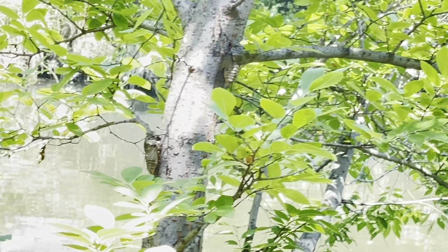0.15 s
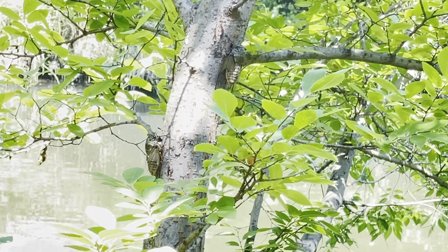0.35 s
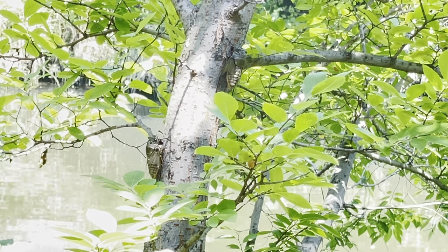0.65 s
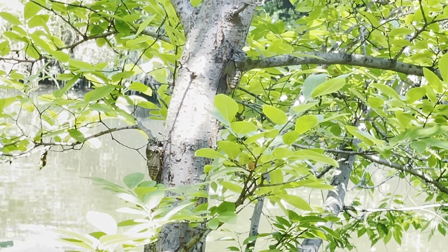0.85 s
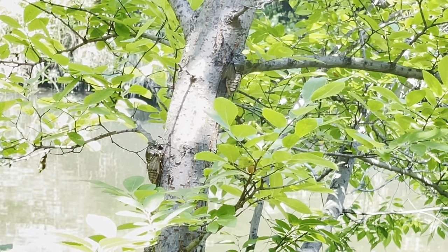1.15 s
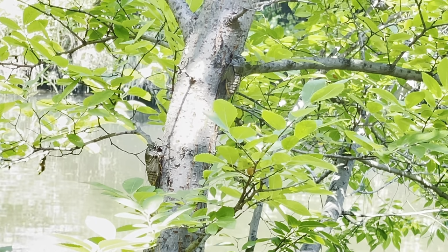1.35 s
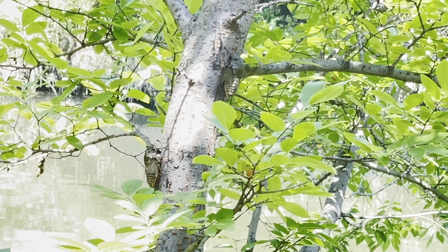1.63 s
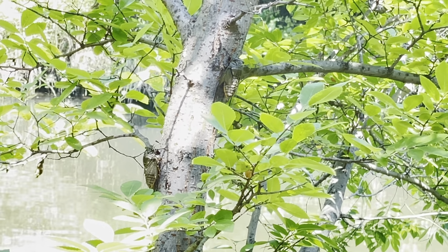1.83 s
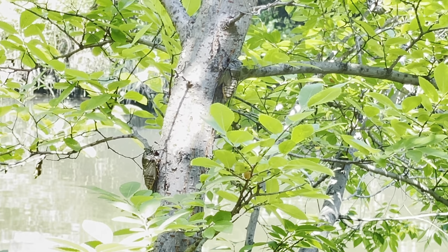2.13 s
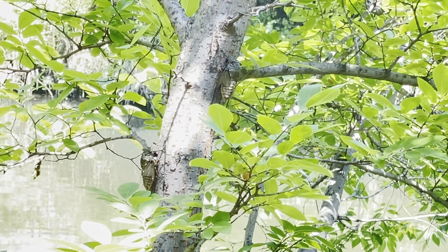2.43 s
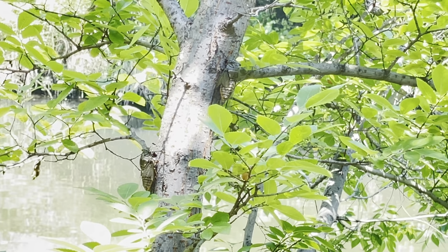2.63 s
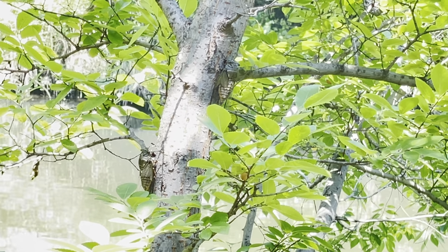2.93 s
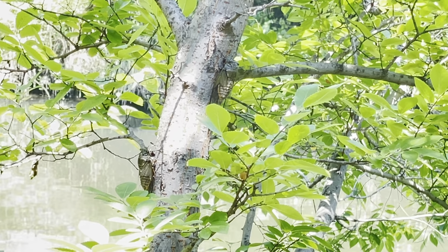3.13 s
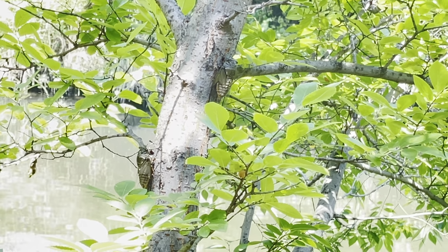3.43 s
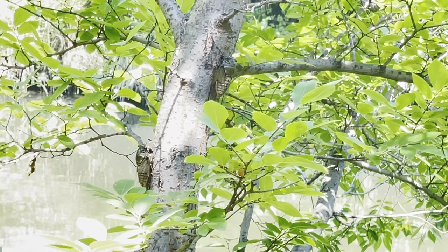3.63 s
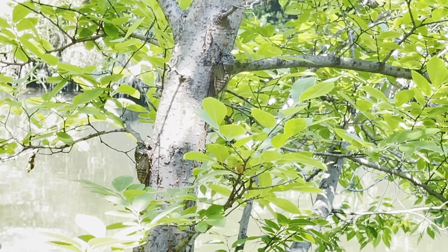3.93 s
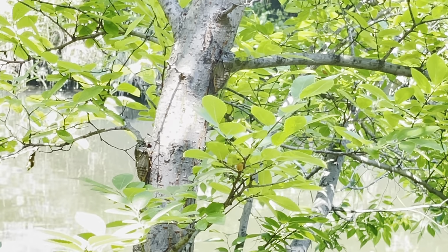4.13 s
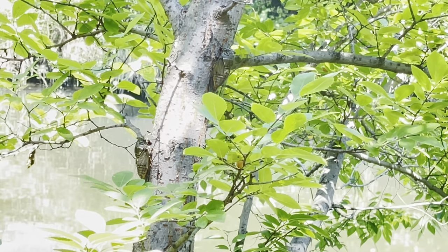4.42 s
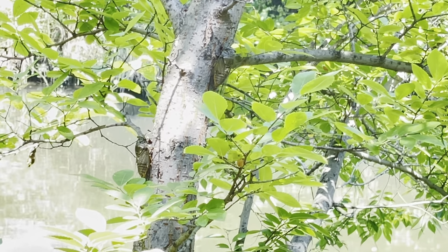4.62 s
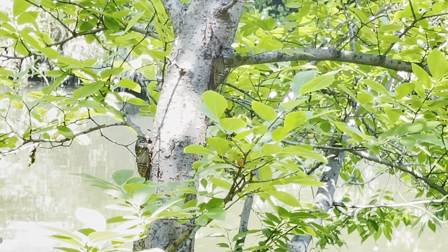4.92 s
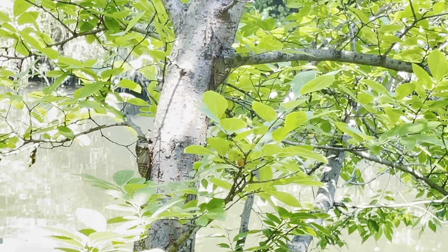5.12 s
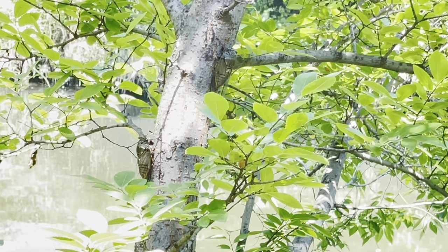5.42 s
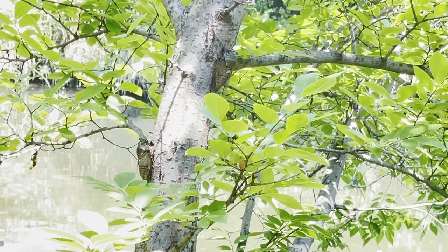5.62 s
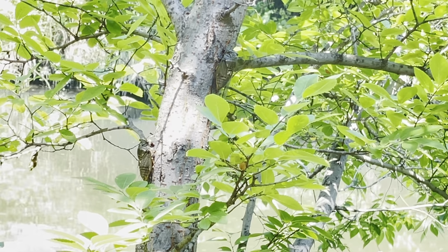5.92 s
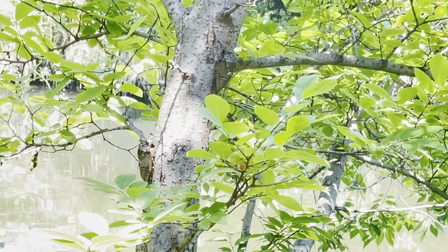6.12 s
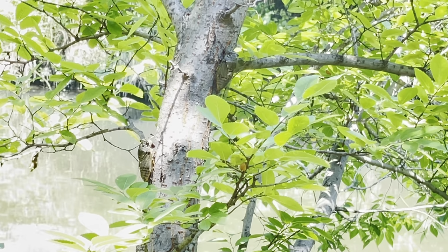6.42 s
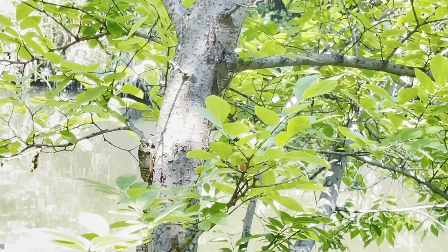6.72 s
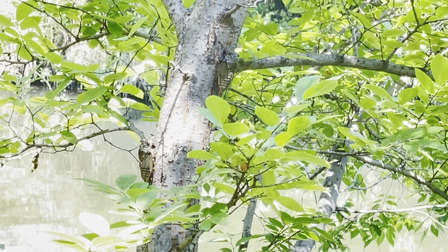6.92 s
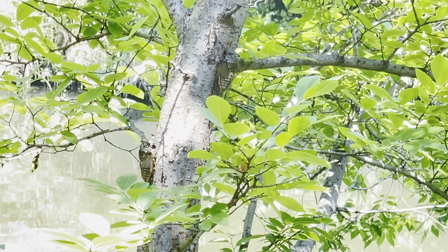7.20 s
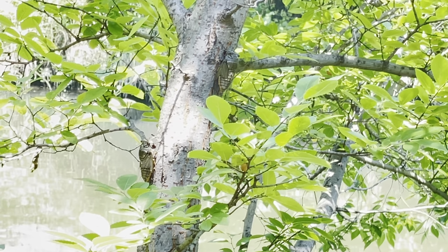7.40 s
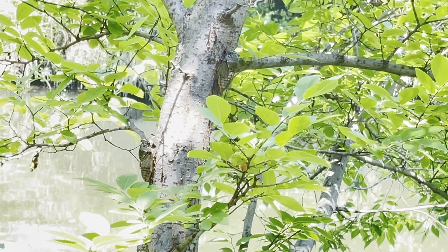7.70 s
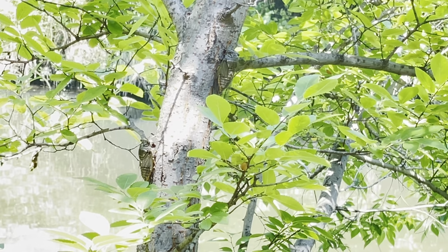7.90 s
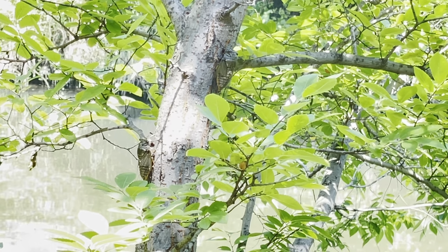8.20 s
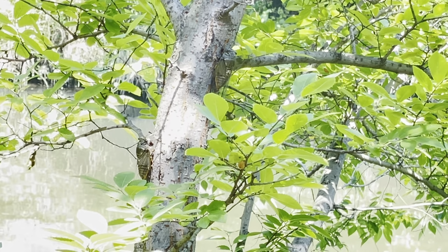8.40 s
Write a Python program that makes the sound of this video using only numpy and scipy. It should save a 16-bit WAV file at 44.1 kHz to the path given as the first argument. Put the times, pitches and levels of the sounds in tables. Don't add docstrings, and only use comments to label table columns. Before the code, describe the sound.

Loud cicadas buzz in overlapping high, raspy trills among waterside trees; one slows and stops, another carries on, a third swells in and sags late.

```python
import sys
import numpy as np
from scipy import signal
from scipy.fft import rfft, irfft
from scipy.io import wavfile
from scipy.ndimage import uniform_filter1d

SR = 44100
rng = np.random.default_rng(int(sys.argv[2]) if len(sys.argv) > 2 else 0)


def how_loud(loudness_db):
    steps = np.asarray(loudness_db, float) / 20
    return 10 ** steps


def inscribe(sig):
    pcm = np.round(np.clip(np.atleast_2d(sig).T, -1, 1) * 32767)
    wavfile.write(sys.argv[1], SR, pcm.astype(np.int16))


N = 377055


def cicada(song, muscle, body, rasp_db, rasp_s):
    # place_in_stroke [0-1], low_db [dB below the split], high_db [dB above it]
    ribs = [
        (.05, -15.5, -1.5),
        (.23, -2, 2),
        (.41, -1.5, 0.4),
        (.59, -0.7, 1.3),
        (.77, -2, -1.5),
    ]
    # centre_hz [Hz], width_hz [Hz], level_db [dB]
    rasp_bands = [(3970, 1920, -0.5), (6250, 2690, 0.5), (8870, 790, -5), (10100, 3800, -5),
                  (12600, 2500, -8)]
    split_hz = 5700
    scatter_db, jitter_s = 1.0, .00015
    stagger_s, stagger_grows_s = .006, .2
    tired_db = -0.13

    stroke_hz, gain = effort(song, muscle)
    head_start = muscle[-1]
    strokes = head_start + np.cumsum(stroke_hz) / SR
    place, low_db, high_db = np.transpose(ribs)
    rib_strokes = np.arange(int(strokes[-1]) + 1)[:, None] + place
    at = np.interp(rib_strokes, strokes, np.arange(N) / SR, left=N, right=N)

    slack = stagger_s * np.exp(np.minimum(at - muscle[0], 0) / stagger_grows_s)
    at = at + slack * rng.standard_normal(at.shape)

    tones = 0
    for mode_hz, width, mode_db, delay_ms in body:
        late, louder = rng.standard_normal((2,) + at.shape)
        rib_db = low_db if mode_hz < split_hz else high_db
        strike_s = at + delay_ms / 1000 + jitter_s * late
        kicks = clicks(strike_s, rib_db + mode_db + scatter_db * louder)
        tones = tones + peak(peak(kicks, mode_hz, width), mode_hz, width)

    after = np.arange(512) / (rasp_s * SR)
    buckles = clicks(at, np.broadcast_to(low_db + high_db, at.shape))
    flex = signal.fftconvolve(buckles, after * np.exp(-after))[:N]
    rasp = ring(np.sqrt(np.abs(flex)) * rng.standard_normal(N), rasp_bands)
    rasp_gain = how_loud(tired_db * (stroke_hz - stroke_hz.max()))
    return (level(tones, 0) + level(rasp, rasp_db) * rasp_gain) * gain


def effort(song, muscle):
    start, db, swell_s, cut_s, fade_db = song
    stop, fresh_hz, lost, tire_s, _ = muscle
    t = np.arange(N) / SR
    slowed = lost * np.exp((np.minimum(t, stop) - stop) / tire_s)
    swell = (1 - np.exp(-np.maximum(t - start, 0) / swell_s)) ** 2
    cut = np.exp(-np.maximum(t - stop, 0) / cut_s)
    return fresh_hz - slowed, how_loud(db - fade_db * slowed) * swell * cut


def clicks(at, db):
    kicks = np.zeros(N + 1)
    np.add.at(kicks, np.clip((at * SR).astype(int), 0, N), how_loud(db))
    return kicks[:N]


def peak(x, hz, width):
    return signal.lfilter(*signal.iirpeak(hz, hz / width, SR), x)


def ring(x, modes):
    total = 0
    for k, (hz, width, db) in enumerate(modes):
        total = total + (-1) ** k * how_loud(db) * peak(x, hz, width)
    return total


def level(x, db):
    return x * how_loud(db) / np.sqrt(np.mean(x ** 2))


def chorus():
    # centre_hz [Hz], width_hz [Hz], level_db [dB]
    bands = [(3610, 750, -4.5), (4900, 910, 1), (6690, 1620, 4), (8660, 6600, -5), (12300, 1200, -8.5)]
    return level(ring(rng.standard_normal(N), bands), -36)


def engine():
    # multiple [of the firing rate], level_db [dB]
    orders = [(2, -3), (3, -13), (4, -12), (5, -5), (6, 0), (7, -4), (8, -16)]
    # middle_s [s], half_length_s [s], level_db [dB]
    loads = [
        (7.6, .27, -54),
        (8.4, .25, -56),
    ]
    firing_hz, gain_hz, mid_s, pull_s = 43.6, 2.9, 7.6, .5

    t = np.arange(N) / SR
    hz = firing_hz + gain_hz * np.tanh((t - mid_s) / pull_s)
    load = sum(how_loud(db) * np.exp(-((t - mid) / half) ** 2 / 2) for mid, half, db in loads)
    turns = 2 * np.pi * np.cumsum(hz * (1 + 0.00745 * walk(10))) / SR
    hum = 0
    for multiple, order_db in orders:
        waver = how_loud(order_db + 3 * walk(9))
        hum = hum + waver * np.sin(multiple * turns + 2 * np.pi * rng.random())
    return load * how_loud(3) * hum


def walk(rate):
    k = int(SR / rate)
    held = np.repeat(rng.standard_normal(N // k + 1), k)[:N]
    return uniform_filter1d(uniform_filter1d(held, k), k)


def town():
    # frequency_hz [Hz], density_db [dB per Hz]
    rumble = [(12, -40), (20, -18), (38, 1), (80, 0.5), (96, 0), (118, -8.5), (163, -10), (361, -16.5),
              (531, -20), (600, -20), (1060, -26.5), (1250, -28), (2120, -29.5), (2600, -26.5), (3380, -62),
              (5720, -120)]
    # frequency_hz [Hz], side_minus_mid_db [dB]
    spread = [(60, -21.5), (200, -13), (400, -11), (700, -7.5), (1300, -7), (2400, -30)]
    rise_db_s, left_bass_db = .33, 1.8

    hz = np.fft.rfftfreq(N, 1 / SR)
    mid, side = rfft(rng.standard_normal((2, N))) * how_loud(shape(rumble, hz))
    mid = irfft(mid, N)
    side = irfft(side * how_loud(shape(spread, hz)), N)
    rise = how_loud(rise_db_s * (np.arange(N) - N / 2) / SR)
    both = level(np.array([mid + side, mid - side]), -49) * rise
    return (both + engine()) * how_loud([[left_bass_db / 2], [-left_bass_db / 2]])


def shape(rows, hz):
    corner_hz, db = np.transpose(rows)
    return np.interp(np.log(hz + 1), np.log(corner_hz + 1), db)


def scene():
    # start_s [s], level_db [dB], swell_s [s], cut_off_s [s], fade_db [dB per stroke a second lost]
    songs = [
        (-8, -27.5, .1, .03, 0.65),
        (-1, -31, .1, 0.064, 0.12),
        (6.5, -29.5, 0.13, .02, 0.3),
    ]
    # stop_s [s], fresh_hz [strokes/s], lost_hz [strokes/s lost by the stop],
    # tiring_s [s], head_start [strokes]
    muscles = [
        (4.31, 47.687, 9.347, .8397, .03),
        (7.5, 49.347, 3.849, 1.635, .41),
        (8.65, 46.879, 15.666, .3418, .10),
    ]
    # mode_hz [Hz], width_hz [Hz], level_db [dB], delay_ms [ms]
    first_body = [(2555, 860, -18.5, .1), (3510, 433, -1.5, .1), (3930, 117, -4, .5), (4336, 310, 2, 0.074),
                  (4910, 410, -2.5, .6), (5488, 194, 2, .1), (6007, 320, -3.5, 1.9), (6540, 240, -4, 1.4),
                  (7160, 950, -9, 1.1), (7880, 600, -8, 1.6), (9040, 730, -12, 1.3), (9520, 350, -13, 2.1),
                  (12000, 630, -14.5, 1.4)]
    second_body = [(3590, 464, -3.5, .1), (4295, 490, -8.5, .4), (4770, 850, 0.5, .1),
                   (5470, 740, -1.2, .7), (6080, 570, -5, 1.9), (6640, 370, -1.9, 1.5),
                   (7080, 510, -5, 2.1), (7960, 810, -8.5, 1.4), (9000, 930, -11, 0.91),
                   (11020, 360, -13, 2.3), (12400, 350, -13.5, 1.6)]
    third_body = [(2440, 330, -12.5, 0.13), (3550, 840, -3.5, 0.092), (4237, 350, 0.5, 0.895),
                  (4860, 660, -3, .4), (5550, 400, 0, 1.114), (6140, 280, -4, 2.1), (6620, 680, -8, 1.7),
                  (7300, 390, -7.5, 2.6), (7940, 250, -12, 1.6), (9200, 460, -14, 0.9),
                  (10600, 810, -18, 1.9), (12460, 380, -31, 1.6)]
    # frequency_hz [Hz], left_lead [radians]
    channel_phase = [(2750, 0), (3250, .66), (5250, .7), (5750, -1.55), (6750, -.85), (7240, -1.35), (7490, -2.2),
                     (8100, -2.25), (8480, -3.1), (8800, -3.2), (9150, -3.6), (9900, -4.15), (12450, -5.4),
                     (13250, -6.28)]
    # frequency_hz [Hz], gain_db [dB]
    air = [(2000, -14.5), (2450, -12.5), (2750, -6), (3000, -0.8), (3300, 1), (12300, 3), (13500, 5),
           (14500, 4), (16000, -1)]

    near = cicada(songs[0], muscles[0], first_body, rasp_db=-5.5, rasp_s=0.0064)
    near = near + cicada(songs[1], muscles[1], second_body, rasp_db=-4, rasp_s=0.0021)
    near = near + cicada(songs[2], muscles[2], third_body, rasp_db=-6.5, rasp_s=0.0029)

    hz = np.fft.rfftfreq(N, 1 / SR)
    lead = np.interp(hz, *np.transpose(channel_phase))
    ahead = rfft(near + chorus()) * np.exp(.5j * np.array([lead, -lead]))
    around = rfft(chorus()) * how_loud(-9) * np.array([[1], [-1]])
    insects = irfft((ahead + around) * how_loud(shape(air, hz)), N)
    return insects + town()


def top_cut(x):
    return signal.sosfilt(signal.butter(12, 15770, fs=SR, output="sos"), x)


def record(dry):
    low_cut = signal.butter(2, 34, "high", fs=SR, output="sos")
    mix = signal.sosfilt(low_cut, dry)
    return top_cut(mix)


dry = scene()
out = record(dry)
inscribe(out)
```